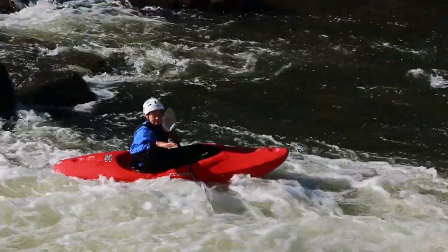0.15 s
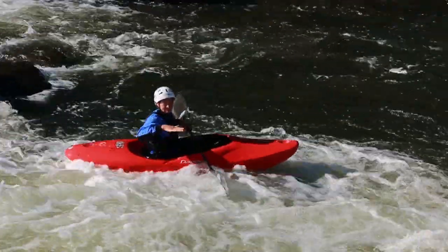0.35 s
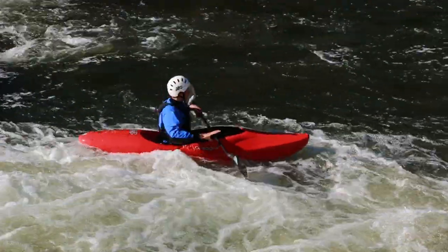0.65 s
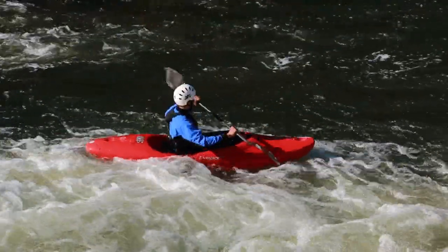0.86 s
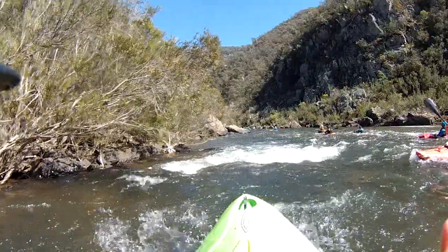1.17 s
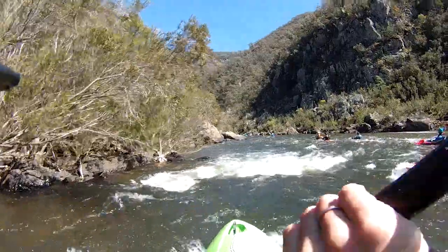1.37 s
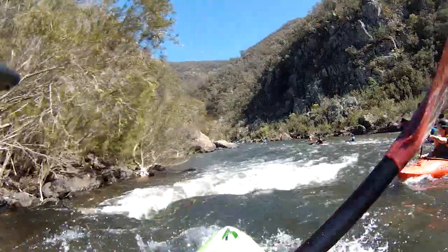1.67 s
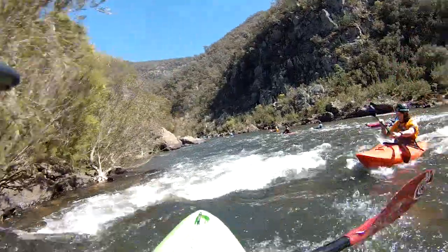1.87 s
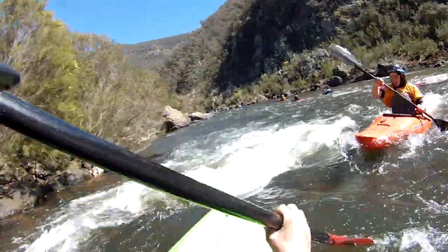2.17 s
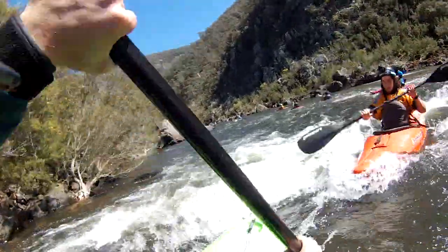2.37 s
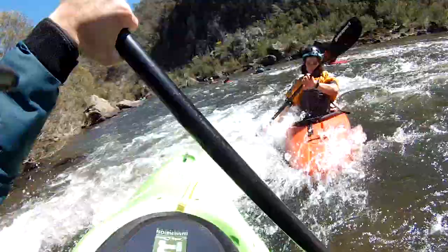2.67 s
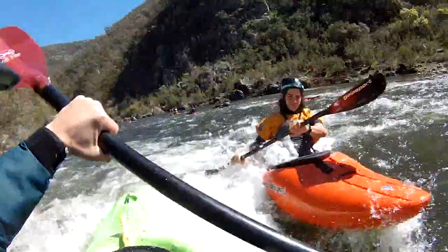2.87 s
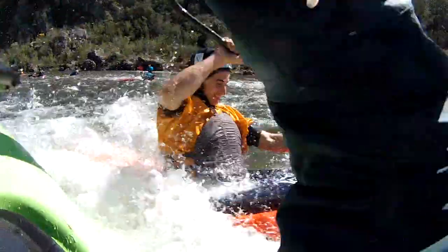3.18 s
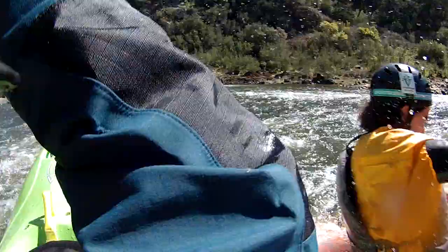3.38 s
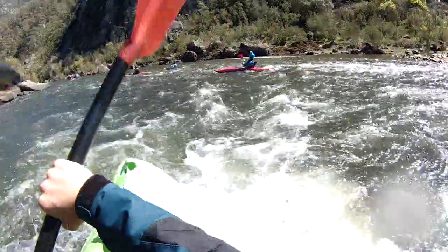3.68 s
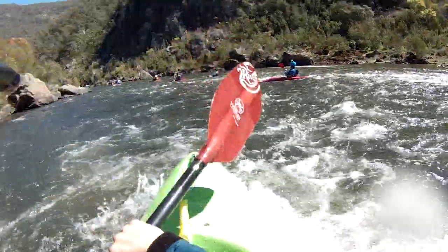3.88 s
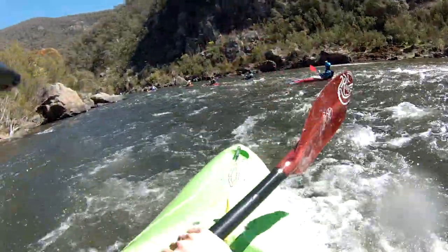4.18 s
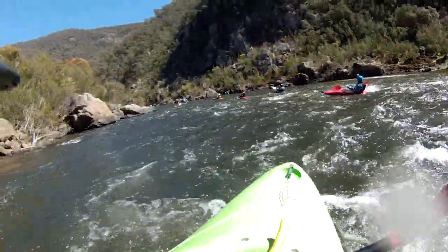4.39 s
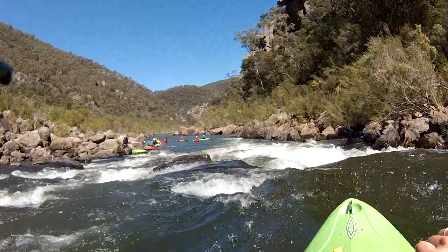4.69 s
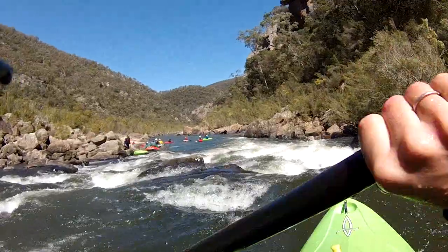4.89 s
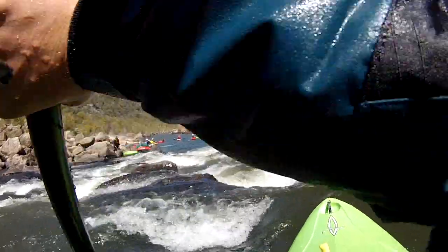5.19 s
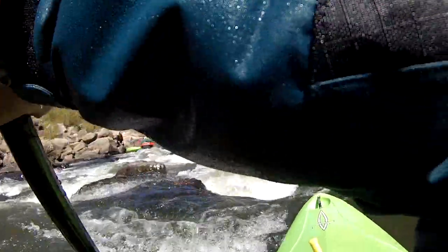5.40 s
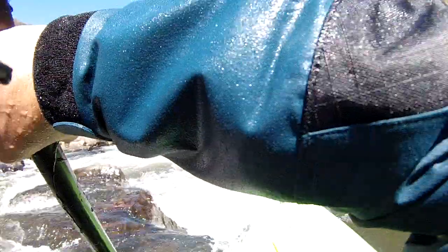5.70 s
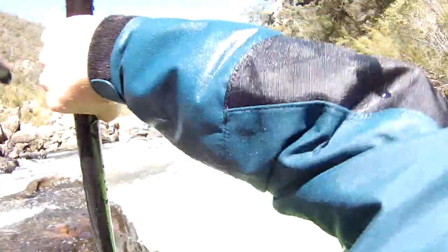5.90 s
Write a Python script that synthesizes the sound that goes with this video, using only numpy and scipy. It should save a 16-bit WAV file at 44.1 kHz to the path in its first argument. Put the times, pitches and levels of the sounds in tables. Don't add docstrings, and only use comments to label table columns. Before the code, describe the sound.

Loud roaring rapids with wind buffeting the microphones, then an abrupt cut to faint, muffled mono river hiss with spatters, ticks and one sharp tap.

```python
import sys
import numpy as np
from scipy import signal
from scipy.fft import rfft, irfft, next_fast_len
from scipy.io import wavfile

SR = 44100
rng = np.random.default_rng(int(sys.argv[2]) if len(sys.argv) > 2 else 0)


def makeup_ratio(level_db):
    decades = np.asarray(level_db, float) / 20
    return 10 ** decades


def master_out(mix):
    frames = np.transpose(np.atleast_2d(mix))
    ceiling = np.clip(frames, -1, 1)
    pcm = np.round(ceiling * 32767).astype(np.int16)
    wavfile.write(sys.argv[1], SR, pcm)


N = 266805

BANK, WAVE, RIFFLE = (0, 1.1115), (1.1115, 4.478), (4.478, 6.05)


def rms_one(x):
    return x / np.sqrt(np.mean(x ** 2) + 1e-20)


def at_hz(points, hz):
    table_hz, value = np.transpose(points)
    return np.interp(np.log(hz), np.log(table_hz), value)


def samples(span):
    return np.arange(round(span[0] * SR), min(round(span[1] * SR), N))


def in_time(rows, span):
    s, *columns = np.transpose(rows)
    return np.array([np.interp(samples(span) / SR, s, c) for c in columns])


def colour(x, gain):
    length = x.shape[-1]
    size = next_fast_len(length)
    hz = np.arange(1, size // 2 + 2) * SR / size
    return irfft(rfft(x, size) * gain(hz), size)[..., :length]


def drift(rate, size):
    r = np.exp(-80 * np.pi * rate / SR)
    noise = rng.standard_normal(size // 40 + 2002)
    slow = signal.lfilter([1], [1, -2 * r, r * r], noise)[2000:]
    return np.interp(np.arange(size) / 40, np.arange(len(slow)), rms_one(slow))


def grains(per_s, spread_db, size):
    size_db = spread_db * np.minimum(rng.exponential(1, size), 4)
    clicks = makeup_ratio(size_db) * np.sign(rng.random(size) - .5)
    return clicks * (rng.random(size) < per_s / SR) + 1e-18


def ring(clicks, hz, t60):
    r, w = makeup_ratio(-3 * 20 / (t60 * SR)), 2 * np.pi * hz / SR
    return signal.lfilter([0, np.sin(w)], [1, -2 * r * np.cos(w), r * r], clicks + 1e-18)


def click_at(s, level_db):
    return makeup_ratio(level_db) * (np.arange(N) == round(s * SR))


def through_case(x):
    return signal.sosfilt(signal.butter(2, 450, "high", fs=SR, output="sos"), x)


CHURN_SHARE = [0.79, 1.085, .05, .05]
SPRAY_SHARE = [0.205, 0.051, 0.702, 1.093]
# [t/s, level/dB of extra spray]
SPLASHES = [(1.93, 1), (2.9, 5), (3.19, 4.5), (3.28, 4), (3.38, 8.5), (3.58, 3.5), (3.7, 2.5), (3.85, 3.5),
            (4.25, 2.5), (4.75, 3), (5.4, 2), (5.55, 4.5), (5.92, 0.5)]


def flow(ride, span):
    churn_db, spray_db = in_time(ride, span)
    t = samples(span) / SR
    rise_s, fall_s = 0.09, 0.049
    for s, db in SPLASHES:
        spray_db = spray_db + db * np.exp(-np.abs(t - s) / np.where(t < s, rise_s, fall_s))
    plough_from_s, plough_to_s, plough_fade_s, plough_db = 2.92, 3.253, 0.26, 4.5
    outside_s = np.maximum(np.maximum(plough_from_s - t, t - plough_to_s), 0)
    boom_db = plough_db * np.exp(-(outside_s / plough_fade_s) ** 2)
    river_db = np.outer(CHURN_SHARE, churn_db) + np.outer(SPRAY_SHARE, spray_db)
    return river_db + np.outer([1, 0, 0, 0], boom_db)


REGISTER_HZ = [300, 1600, 6500, 12000]


def water(flow_db, patchy_db, bubbly, crackle):
    size = flow_db.shape[1]
    swell_db = flow_db - flow_db.mean(axis=1, keepdims=True)
    together = 0.6 * drift(9.3, size) + 0.45 * drift(34.5, size)
    flicker = drift(47.3, size)
    white, out = rng.standard_normal((2, size)), 0
    spray = rms_one(grains(90.0, 3.0, size))
    share = np.clip(bubbly, 0, 1)
    for k, hz in enumerate(25 * 2 ** np.arange(0, 9.5, 1 / 3)):
        edges = hz * 2 ** (np.array([-1, 1]) / 6)
        place = np.interp(np.log(hz), np.log(REGISTER_HZ), np.arange(4))
        source = white[k % 2] + crackle * max(place - 1.4, 0) * spray
        band = signal.butter(2, edges, "band", fs=SR, output="sos")
        hiss = rms_one(signal.sosfilt(band, source))
        bubbles = rms_one(ring(grains(.08 * hz, 4.07, size), hz, 10.4 / hz))
        level_db = np.maximum(1 - np.abs(place - np.arange(4)), 0) @ swell_db
        level_db = level_db + patchy_db * (together + 0.29 * drift(10.2, size))
        level_db = level_db + 0.187 * place * flicker
        mix = np.sqrt(1 - share) * hiss + np.sqrt(share) * bubbles
        out = out + np.sqrt(hz) * makeup_ratio(level_db) * mix
    return out


# [t/s, churn level/dB, spray level/dB]
BANK_HEAVE = [
    (0, -1, -0.5),
    (.37, 1.5, 2),
    (.6, -1, -1.5),
    (.8, 1, 2),
    (1.11, -0.5, 0),
]
# [f/Hz, level/dB per Hz]
BANK_COLOUR = [(30, -17), (100, -1), (250, -3.5), (500, -5), (800, -6.5), (930, -7.5), (995, -1.5),
               (1070, -9.5), (1500, -11), (2400, -13.5), (3000, -15.5), (5500, -22), (14600, -36.5),
               (15200, -54)]
# [f/Hz, share 0-1]
OWN_SHARE = [(200, .25), (1000, .1), (2000, .24), (4000, .36), (8000, .52), (14000, .65)]
# [f/Hz, left minus right level/dB]
BANK_PAN = [(300, 4.5), (1000, 3.5), (4000, 8), (14000, 8.5)]


def bank_river():
    flow_db = flow(BANK_HEAVE, BANK)
    common, left, right = [water(flow_db, patchy_db=.5, bubbly=0.098, crackle=.06) for _ in range(3)]
    right_late_s = .0001

    def own(hz):
        return np.sqrt(np.clip(at_hz(OWN_SHARE, hz), 0, 1))

    def shared(hz):
        return np.sqrt(1 - own(hz) ** 2)

    def shared_late(hz):
        return shared(hz) * np.exp(-2j * np.pi * hz * right_late_s)

    left = colour(left, own) + colour(common, shared)
    right = colour(right, own) + colour(common, shared_late)
    sides = np.array([[.5], [-.5]])
    pair = colour(np.array([left, right]),
                  lambda hz: makeup_ratio(at_hz(BANK_COLOUR, hz) + sides * at_hz(BANK_PAN, hz)))
    return makeup_ratio(-24.5) * rms_one(pair)


# [t/s, change of level/dB, change of left minus right level/dB]
VEERS = [
    (.09, -0.3, -7),
    (.37, 2.7, -7),
    (.46, -5, 2),
    (.93, 1.52, -7.5),
    (1.1, 2, -3),
]


def gusts():
    t = samples(BANK) / SR
    s, level_db, pan_db = np.transpose(VEERS)
    veer_s = 0.0543
    bump = np.exp(-((t[:, None] - s) / veer_s) ** 2)
    return -23 + bump @ level_db, 7.5 + bump @ pan_db


# [f/Hz, level/dB per Hz]
WIND_COLOUR = [(20, -35.5), (50, -7.5), (120, 2), (280, 0), (450, -9), (800, -22.5), (1500, -53.5)]


def wind_rumble():
    level_db, pan_db = gusts()
    size = len(level_db)
    lumps_db = (2.2, 1.4)
    pushes = np.array([grains(700.0, 2.51, size) * makeup_ratio(db * drift(25.0, size)) for db in lumps_db])
    shared = colour(pushes[::-1], lambda hz: np.clip((hz - 130) / 500, 0, 1))
    rumble = colour(pushes + shared, lambda hz: makeup_ratio(at_hz(WIND_COLOUR, hz)))
    sides = np.array([[.5], [-.5]])
    return makeup_ratio(level_db - 0.88 + sides * pan_db) * np.array([rms_one(r) for r in rumble])


# [t/s, peak level/dB, f/Hz]
LEFT_POPS = [(.040, -7.5, 303), (.168, -3.5, 230.2), (.330, -9, 345), (.350, -7, 332), (.378, -3, 364),
             (.404, -6.5, 329.1), (.425, -5.5, 304), (.449, -6, 300), (.463, -5.5, 407),
             (.560, -6.5, 281.5), (.570, -8.5, 279), (.662, -12.5, 259), (.814, -4, 370.1), (.828, -8, 282),
             (.980, -3.5, 327), (1.048, -7.5, 330), (1.058, -2, 324), (1.1108, -2.5, 258)]
# [t/s, peak level/dB, f/Hz]
RIGHT_POPS = [
    (0.046, -15.5, 270),
    (0.096, -9.5, 208),
    (.159, -10.5, 270),
    (.794, -10.5, 300),
    (1.026, -15, 200),
    (1.037, -9, 177),
]


def wind_pops():
    t = samples(BANK) / SR
    out = np.zeros((2, len(t)))
    for side, pops in enumerate([LEFT_POPS, RIGHT_POPS]):
        for s, peak_db, hz in pops:
            cycles = (t - s) * hz
            out[side] -= makeup_ratio(peak_db - 0.36) * np.sin(2 * np.pi * cycles) * np.exp(-(cycles / 0.5) ** 2)
    return out


def cased_river(span, ride, spectrum, level_db):
    wet = water(flow(ride, span), patchy_db=0.8641, bubbly=0.162, crackle=0.275)
    return makeup_ratio(level_db) * rms_one(colour(wet, lambda hz: makeup_ratio(at_hz(spectrum, hz))))


# [t/s, churn level/dB, spray level/dB]
WAVE_RIDE = [
    (1.12, 0, 1.5),
    (1.6, 0, 0.5),
    (2.15, 0.98, 1.5),
    (2.35, 3.5, 6),
    (2.8, 3, 6.5),
    (2.9, 6, 9),
    (3.45, 4, 10),
    (3.93, 3.5, 12.5),
    (4.02, 1.13, 7.5),
    (4.47, -2, 4),
]
# [f/Hz, level/dB per Hz]
WAVE_COLOUR = [(30, -23), (200, -8), (700, -1.5), (1050, -2.5), (1650, 2.5), (2500, -8.5), (4000, -21),
               (5500, -16.5), (6500, -2.5), (7600, -12), (9000, -13), (10500, -17), (13600, -15.5),
               (15200, -18)]


def wave_river():
    return cased_river(WAVE, WAVE_RIDE, WAVE_COLOUR, -49)


# [t/s, peak level/dB, f/Hz, t60/s]
THUDS = [(1.33, -60, 151, 0.053), (1.975, -55, 58, 0.14), (2.56, -61, 250, 0.042),
         (2.923, -42.5, 201, 0.037), (3.04, -67.5, 50, 0.078), (3.601, -38.5, 557, 0.028),
         (3.606, -44, 195, 0.069), (3.615, -45, 348, 0.0415), (3.62, -53.5, 110, 0.079),
         (3.635, -57, 52.3, 0.106), (3.674, -51.5, 330, 0.026), (4.484, -45.5, 394.9, 0.045),
         (4.516, -48.5, 329, 0.036), (4.550, -50.5, 400, 0.032)]


def hull_thuds():
    out = 0
    for s, db, hz, t60 in THUDS:
        push = ring(click_at(s, db), hz, 2.55 / hz) * 5.37 * hz / SR
        out = out + ring(push, hz, t60)
    return out


# [t/s, peak level/dB]
SPATTER = [(1.484, -51), (1.957, -46.5), (2.4391, -43.5), (2.5247, -45), (2.7954, -46.5), (3.0743, -42.5),
           (3.0949, -43.5), (3.179, -41.5), (3.3344, -41.5), (3.3524, -42), (3.3824, -39), (3.4564, -42),
           (3.5334, -45), (3.5574, -45), (3.5714, -37), (3.8277, -42), (3.8494, -43.5), (3.913, -38),
           (3.9695, -41), (3.989, -42.5), (4.2897, -43), (5.3897, -50.5)]


def spatter():
    fade_s = 0.00252
    bursts = sum(click_at(s, db - 5.5) for s, db in SPATTER)
    envelope = signal.lfilter([1], [1, -np.exp(-1 / (fade_s * SR))], bursts)
    band = signal.butter(2, [7000, 14500], "band", fs=SR, output="sos")
    return envelope * rms_one(signal.sosfilt(band, rng.standard_normal(N)))


# [t/s, peak level/dB, f/Hz]
DROPS = [(1.811, -44, 1590), (1.887, -37.5, 1396), (1.952, -48.5, 1600), (1.965, -38.5, 1810),
         (2.095, -38, 1480), (2.172, -38.5, 1460), (2.269, -46.5, 1220), (2.859, -34.5, 1733),
         (3.366, -32, 660), (3.828, -34, 1500), (4.269, -34.5, 1750), (4.276, -37.5, 1336),
         (4.809, -38.5, 1522)]


def drop_ticks():
    out = 0
    for s, db, hz in DROPS:
        push = ring(click_at(s, db - 4.5), hz, 2.0 / hz) * 8.13 * hz / SR
        out = out + ring(push, hz, 0.0134) + ring(click_at(s, db - 10.0), 7130, 0.0062)
    return through_case(out)


# [t/s, level/dB]
TAP = [
    (2.76405, -17),
    (2.76477, -28.5),
]
# [f/Hz, level/dB, t60/s]
CASE_MODES = [(1264, -17, 0.0145), (2080, -14, 0.0116), (2593, -3.5, 0.00516), (3278, 1.5, 0.0104),
              (3770, -2, 0.00595), (4350, -4.5, 0.0065), (6210, -9.5, 0.0057), (7350, -3, 0.0068),
              (8940, -12, 0.0039), (12500, -26.5, .0025)]


def case_tap():
    (touch_s, touch_db), (leave_s, leave_db) = TAP
    force = click_at(touch_s, touch_db) - click_at(leave_s, leave_db)
    tap = 0
    for k, (hz, db, t60) in enumerate(CASE_MODES):
        tap = tap + (-1) ** k * ring(makeup_ratio(db) * force, hz, t60)
    return through_case(signal.lfilter(*signal.iirnotch(4040, 14.0, SR), tap))


# [t/s, churn level/dB, spray level/dB]
RIFFLE_RIDE = [
    (4.48, 0.28, -2),
    (5.1, 0.5, 0.5),
    (5.8, 2, 3.5),
    (6.05, 3, 9),
]
# [f/Hz, level/dB per Hz]
RIFFLE_COLOUR = [(30, -24), (180, -3.5), (500, 0.5), (1150, -1.5), (1800, 2.5), (2500, -8.5), (3600, -21),
                 (5500, -22.5), (6500, -6.5), (7500, -12), (8800, -13), (10500, -19.5), (13600, -20.5),
                 (15200, -28.5)]


def riffle_river():
    return cased_river(RIFFLE, RIFFLE_RIDE, RIFFLE_COLOUR, -52.5)


def scene():
    out = np.zeros((2, N)) + hull_thuds() + spatter() + drop_ticks() + case_tap()
    out[:, samples(BANK)] += bank_river() + wind_rumble() + wind_pops()
    out[:, samples(WAVE)] += wave_river()
    out[:, samples(RIFFLE)] += riffle_river()
    return out


# [from f/Hz, to f/Hz, least level/dB of the treble under them]
TOP_BANDS = [(13700, 14420, -77.5), (14420, 15170, -64.2)]


def drop_weak_bands(x):
    frame, lead = 1024, 1024 - 485
    hz, _, frames = signal.stft(np.pad(x, ((0, 0), (lead, 0))), SR, "cosine", 2 * frame, frame)
    under = frames[:, (hz >= 13050) & (hz < 13700)].mean(axis=0)
    power = np.sum(np.abs(under) ** 2, axis=0)
    for low_hz, high_hz, least_db in TOP_BANDS:
        frames[:, (hz >= low_hz) & (hz < high_hz)] *= power > makeup_ratio(2 * least_db)
    frames[:, hz >= TOP_BANDS[-1][1]] = 0
    return signal.istft(frames, SR, "cosine", 2 * frame, frame)[1][:, lead:][:, :N]


def band_limit(x):
    return signal.sosfilt(signal.butter(12, 15690, fs=SR, output="sos"), x)


def record(dry):
    thin = signal.butter(2, 400, "high", fs=SR, output="sos")
    hiss = signal.sosfilt(thin, rng.standard_normal(N))
    mix = drop_weak_bands(dry + makeup_ratio(-63.5) * hiss)
    return band_limit(mix)


dry = scene()
out = record(dry)
master_out(out)
```